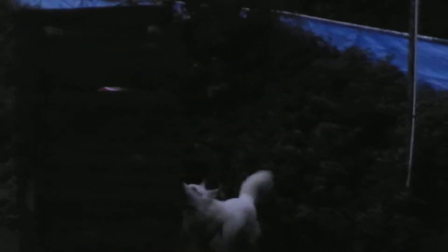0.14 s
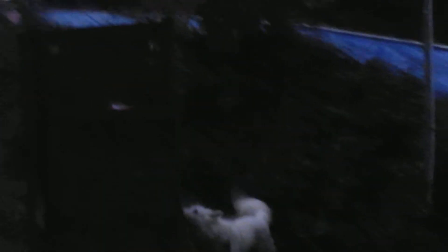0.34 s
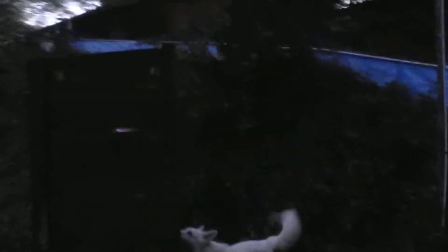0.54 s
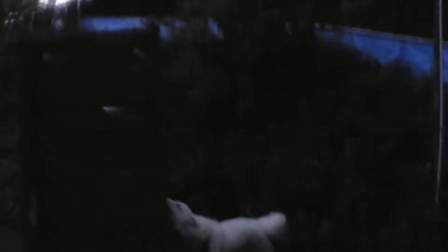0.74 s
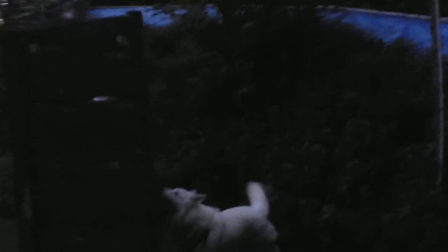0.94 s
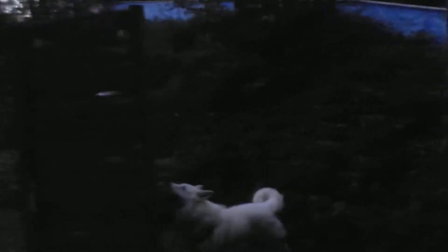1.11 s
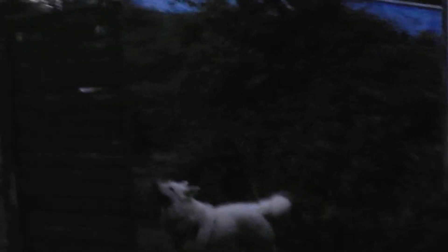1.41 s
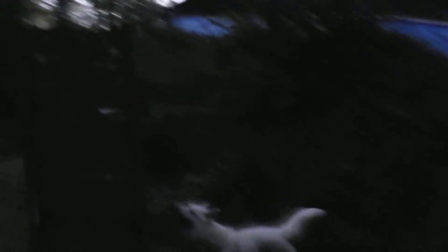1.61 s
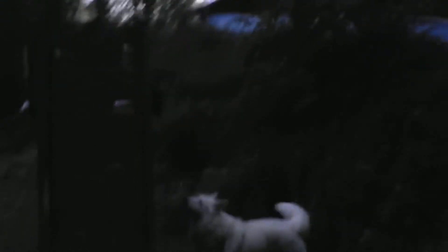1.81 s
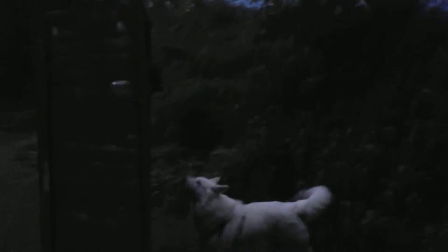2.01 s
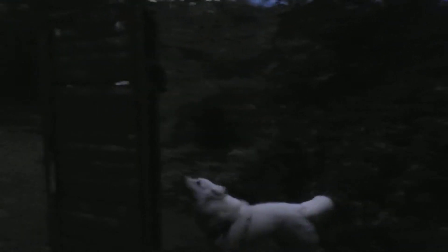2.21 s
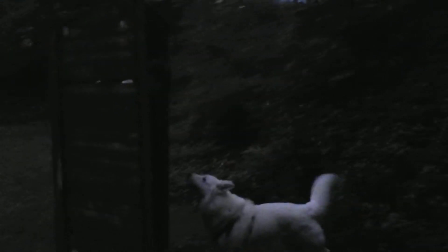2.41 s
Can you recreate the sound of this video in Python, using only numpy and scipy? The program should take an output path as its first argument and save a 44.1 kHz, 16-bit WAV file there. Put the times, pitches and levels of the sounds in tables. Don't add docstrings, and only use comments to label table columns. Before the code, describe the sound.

A large dog barks loudly at about 0.25, 0.8 and 2.15 seconds, each bark a short hoarse burst rising into a clear tone, then echoing off fences and walls. Light scuffs and ticks open the scene; a click comes near 1.2, soft steps around 1.6, and a faint distant call near 1.76. Sharp lead clicks, a quick whip and thud precede the last bark. Low outdoor hum, dull treble.

```python
import sys
import numpy as np
from scipy import signal
from scipy.io import wavfile
from scipy.ndimage import uniform_filter1d

SR = 44100
rng = np.random.default_rng(int(sys.argv[2]) if len(sys.argv) > 2 else 0)


def dump_mix(stems):
    frames = np.atleast_2d(stems).T
    limited = np.clip(frames, -1, 1)
    pcm = np.round(limited * 32767).astype(np.int16)
    wavfile.write(sys.argv[1], SR, pcm)


def nominal_scale(level):
    x = np.asarray(level, float) / 20
    return 10 ** x


N = 112454


def rms_one(x):
    return x / np.sqrt(np.mean(x ** 2) + 1e-20)


def at_hz(points, hz):
    table_hz, table_db = np.transpose(points)
    return np.interp(np.log(hz), np.log(table_hz), table_db)


def drift(rate_hz, size):
    r = np.exp(-2 * np.pi * rate_hz / SR)
    settle = 9000
    wander = signal.lfilter([1], [1, -2 * r, r * r], rng.standard_normal(size + settle))
    return rms_one(wander[settle:])


def resonate(x, hz, width_hz):
    r = np.exp(-np.pi * width_hz / SR)
    poles = [1, -2 * r * np.cos(2 * np.pi * hz / SR), r * r]
    return signal.lfilter([(1 - r * r) / 2, 0, (r * r - 1) / 2], poles, x)


def band(x, low_hz, high_hz):
    sos = signal.butter(2, [low_hz, min(high_hz, .45 * SR)], "band", fs=SR, output="sos")
    return signal.sosfilt(sos, x)


def add(out, start_s, x):
    i = int(start_s * SR)
    out[i:i + len(x)] += x[:len(out) - i]


def hum():
    # pitch_hz [Hz], level_db [dB per Hz]
    hum_colour = [(15, -43), (25, -13.5), (322, -1), (826, -14.5), (945, -8), (6730, -41), (10100, -42.5),
                  (14300, -40), (15500, -62)]
    hum_db, flicker_db, together_db = -47, 2.2, 0.45
    out = 0
    edges_hz = 22 * 2 ** np.arange(0, 9.6, .5)
    white = rng.standard_normal((2, N))
    together = drift(10, N)
    for k, (low, high) in enumerate(zip(edges_hz, edges_hz[1:])):
        colour_db = at_hz(hum_colour, np.sqrt(low * high))
        flicker = together_db * together + flicker_db * drift(9, N)
        out = out + band(white[k % 2], low, high) * nominal_scale(colour_db + flicker)
    return nominal_scale(hum_db) * rms_one(out)


def paws():
    # start_s [s], level_db [dB], pitch_hz [Hz]
    paw_falls = [
        (1.8, -40, 46),
        (1.585, -40.5, 150),
        (1.605, -31.5, 110),
        (0.0033, -40, 94),
    ]
    out, t = np.zeros(N), np.arange(2000) / SR
    for start_s, level_db, hz in paw_falls:
        add(out, start_s, nominal_scale(level_db) * np.sin(2 * np.pi * hz * t) * nominal_scale(-60 * t / 0.033))
    return out


def scuffs():
    scuff_starts = [.019, .094, .1, .103, .141, .162, .578, .62, .96, 1.21, 1.552, 1.577, 1.6, 1.76, 1.82,
                    1.925, 1.97, 2.09, 2.1085, 2.1385, 1.8, 1.905, 1.97]
    # length_s [s], level_db [dB], centre_hz [Hz]
    scuff_bursts = [(0.018, -51.5, 2170), (0.01, -33, 1970), (0.2, -52.5, 5550), (0.029, -35, 2800),
                    (0.022, -38.5, 3230), (0.021, -37, 1870), (0.017, -37.5, 1180), (0.0069, -46, 1700),
                    (0.068, -60.5, 6700), (0.0095, -56, 3160), (0.018, -43.5, 960), (0.017, -47, 1380),
                    (0.022, -41.5, 690), (0.17, -58.5, 2340), (0.24, -58.5, 3150), (0.045, -59.5, 4900),
                    (0.028, -55.5, 5900), (0.013, -33.5, 2070), (0.021, -25, 1690), (.012, -25.5, 2240),
                    (0.082, -56.5, 13000), (.06, -62.5, 6800), (.02, -56.5, 13000)]
    half_width_octaves, grains_per_s, grain_db = 0.67, 4900, 3.5
    out = np.zeros(N)
    noise = rng.standard_normal(N)
    struck = rng.random(N) < grains_per_s / SR
    grains = struck * nominal_scale(grain_db * rng.exponential(1, N))
    grit = noise * (1.4 + grains) * nominal_scale(2.5 * drift(300, N))
    for start_s, (length_s, level_db, hz) in zip(scuff_starts, scuff_bursts):
        u = np.linspace(0, 1.5, int(1.78 * length_s * SR))
        piece = grit[int(start_s * SR):][:len(u)]
        burst = band(piece, hz / 2 ** half_width_octaves, hz * 2 ** half_width_octaves)
        attack = np.clip(u * 62.0, 0, 1)
        release = np.clip((1.5 - u) * 0.95, 0, 1) ** 2
        add(out, start_s, nominal_scale(level_db) * rms_one(burst) * attack * release)
    return out


def ticks():
    tick_starts = [.0633, .084, .0992, .1177, 1.1905, 1.1907, 1.897, 1.9395, 2.0583, 2.0585, 2.1298]
    # peak_db [dB], body_hz [Hz], t60_s [s]
    tick_bodies = [(-23.5, 3260, 0.0014), (-35, 2500, 0.011), (-20, 1100, 0.011), (-21, 1900, 0.0069),
                   (-13, 730, 0.009), (-18.5, 2830, 0.005), (-50.5, 620, 0.008), (-34.5, 5600, .004),
                   (-8.5, 5600, 0.00096), (1, 1860, 0.0015), (-18, 2100, 0.0096)]
    crack_hz = 4200
    out, t = np.zeros(N), np.arange(1000) / SR
    for start_s, (peak_db, hz, t60_s) in zip(tick_starts, tick_bodies):
        noise = rng.standard_normal(len(t)) * nominal_scale(-60 * t / 0.002)
        crack = 0.4 * band(noise, 730, crack_hz)
        ring = np.sin(2 * np.pi * hz * t) * nominal_scale(-60 * t / t60_s)
        add(out, start_s, nominal_scale(peak_db) * (crack - band(ring, 330, 7.4 * crack_hz)))
    return out


def clear_tone(t, pitch, bright, second_db, rough):
    # pitch_hz [Hz], level_db [dB]
    throat_colour = [(300, -8), (480, 2.5), (950, 0.5), (1350, -0.86), (1950, 3),
                     (2430, -22), (2900, -24), (3400, -30), (3900, -29), (4400, -38), (5500, -46)]
    break_db, breaks_per_s = 8, 70
    phase = 2 * np.pi * np.cumsum(pitch) / SR
    tone, power = 0, 0
    for k in range(1, 15):
        mouth_db = bright * np.log2(min(k, 4) * pitch / 1000)
        gain = nominal_scale(at_hz(throat_colour, k * pitch) + mouth_db + second_db * (k == 2))
        depth_db = break_db * (.4 if k == 2 else 1) * rough
        breaks = nominal_scale(depth_db * (drift(breaks_per_s, len(t)) - rough))
        tone = tone + gain * breaks * np.sin(k * phase + k * k)
        power = power + gain ** 2 / 2
    return band(tone / np.sqrt(power), 256, 6200)


def hoarse_rasp(pitch, bright, closed, shimmer, noise, resonances):
    jitter, shimmer_db, low_hz, top_hz = .25, 5, 356, 2450
    wobble = drift(150.6, len(pitch))
    cycles = np.cumsum(pitch * np.exp(jitter * wobble)) / SR
    pulses = np.diff(np.floor(cycles), prepend=0) * nominal_scale(shimmer_db * shimmer)
    drive = -rms_one(pulses) + 0.61 * noise
    rasp = 0
    for k, (hz, width_hz, level_db, closed_db) in enumerate(resonances):
        ring = rms_one(resonate(resonate(drive, hz, width_hz), hz, 2.0 * width_hz))
        colour_db = level_db + closed_db * closed + bright * np.log2(hz / 1000)
        rasp = rasp + (-1) ** k * nominal_scale(colour_db) * ring
    rasp = band(band(rasp, low_hz, top_hz), low_hz / 2, top_hz)
    return rasp / np.sqrt(uniform_filter1d(rasp ** 2, size=900, mode="mirror"))


def bark(rows, hoarse, resonances):
    # centre_hz [Hz], level_db [dB]
    teeth_air = [(3300, -36.5), (4800, -37), (6500, -42.5), (10000, -43.5)]
    blend_s, edge_s, air_when_clear, rough_db = 0.017, 0.0018, 0.2, 1.55
    chest_hz, chest_db, chest_s = 133, -19, 0.031
    s, *contours = np.transpose(rows)
    t = np.arange(s[0], s[-1], 1 / SR)
    level_db, pitch, bright, second_db = [np.interp(t, s, c) for c in contours]
    clear_from, clear_until, start, clear, end = hoarse
    turns_s = [clear_from - blend_s, clear_from + blend_s, clear_until, clear_until + blend_s / 2]
    rough = np.interp(t, turns_s, [start, clear, clear, end])
    closed = np.clip((t - clear_until) / blend_s, 0, 1)
    shimmer, noise = drift(200, len(t)), rng.standard_normal(len(t))

    tone = clear_tone(t, pitch, bright, second_db, rough)
    rasp = hoarse_rasp(pitch, bright, closed, shimmer, noise, resonances)
    puffs = noise * (1 + 1.6 * np.sin(2 * np.pi * np.cumsum(pitch) / SR)) * nominal_scale(0.7 * shimmer)
    air = sum(nominal_scale(db) * rms_one(band(puffs, hz / 1.3, hz * 1.174)) for hz, db in teeth_air)
    push = np.exp(-((t - t[0]) / chest_s) ** 4)
    chest = nominal_scale(chest_db) * rms_one(resonate(noise, chest_hz, 150)) * push

    edges = np.clip(np.minimum(t - t[0], t[-1] - t) / edge_s, 0, 1)
    gain = edges * nominal_scale(level_db)
    hoarse_part = nominal_scale(rough_db) * np.sqrt(rough) * rasp + np.sqrt(air_when_clear + rough) * air + chest
    return gain * np.sqrt(1 - rough) * tone, gain * hoarse_part, 1 - rough


def pops():
    pop_starts = [.2535, .2605, .8045, .8195, 2.1625, 2.1765]
    # peak_db [dB], ring_hz [Hz], t60_s [s]
    pop_rings = [
        (-7, 650, .02),
        (-9, 2050, .012),
        (-5, 1300, .012),
        (-6, 580, .022),
        (-6, 590, .025),
        (-6, 600, .02),
    ]
    out, t = np.zeros(N), np.arange(1500) / SR
    for start_s, (peak_db, hz, t60_s) in zip(pop_starts, pop_rings):
        add(out, start_s, -nominal_scale(peak_db) * np.sin(2 * np.pi * hz * t) * nominal_scale(-60 * t / t60_s))
    return out


def far_call():
    # start_s [s], length_s [s], pitch_hz [Hz], level_db [dB]
    call_setting = (1.757, .08, 1330, -51)
    start_s, length_s, hz, level_db = call_setting
    out = np.zeros(N)
    u = np.linspace(0, np.pi, int(length_s * SR))
    call = rms_one(resonate(rng.standard_normal(len(u)), hz, 40))
    add(out, start_s, nominal_scale(level_db) * np.sin(u) * call)
    return out


def lead():
    # start_s [s], pitch_hz [Hz], level_db [dB]
    whip_glide = [
        (2.0516, 3020, -50),
        (2.0568, 3340, -13),
        (2.0588, 4280, -38),
        (2.064, 4190, -27),
        (2.068, 3240, -24.5),
        (2.076, 2420, -26),
        (2.081, 1680, -31),
    ]
    thud_s, thud_hz, thud_db, thud_width_s = 2.1165, 188, -15, 0.0025
    out = np.zeros(N)
    s, hz, level_db = np.transpose(whip_glide)
    t = np.arange(s[0], s[-1], 1 / SR)
    gain = nominal_scale(np.interp(t, s, level_db) + 2.0 * drift(650, len(t)))
    pitch = np.interp(t, s, hz) * (1 + 0.092 * drift(810, len(t)))
    add(out, s[0], gain * np.sin(2 * np.pi * np.cumsum(pitch) / SR))
    t = np.arange(N) / SR - thud_s
    bump = np.exp(-(t / thud_width_s) ** 2 / 2)
    return out + nominal_scale(thud_db) * np.cos(2 * np.pi * thud_hz * t) * bump


def yard(x, t60_s):
    # delay_s [s], spread_s [s], swell_db [dB]
    far_walls = [
        (0.2, 0.012, 10.4),
        (0.409, 0.08, 3.9),
        (0.29, 0.04, 2.3),
    ]
    # centre_hz [Hz], width_hz [Hz], share [0-1]
    echo_dips = [(480, 200, .25), (1930, 450, .8)]
    yard_db, low_hz, high_hz, build_up_s = -26.5, 685, 1580, 0.01
    t = np.arange(int(1.6 * SR)) / SR
    shape_db = -60 * t / t60_s + sum(db * np.exp(-((t - s) / w) ** 2) for s, w, db in far_walls)
    tail = rng.standard_normal(len(t)) * nominal_scale(shape_db) * np.clip(t / build_up_s, 0, 1)
    dull = signal.butter(1, [low_hz, high_hz], "band", fs=SR, output="sos")
    tail = signal.sosfilt(dull, tail)
    for hz, width_hz, share in echo_dips:
        tail = tail - share * resonate(tail, hz, width_hz)
    tail = tail / np.sqrt(np.sum(tail ** 2))
    return nominal_scale(yard_db) * signal.fftconvolve(x, tail)[:N]


def scene():
    # start_s [s], level_db [dB], pitch_hz [Hz], mouth brightness [dB per octave],
    # lift of the second overtone [dB]
    bark_contours = [
        [(.229, -31, 317.3, -4, 13), (.253, -12.5, 325.1, 2, -4.5), (.27, -12.5, 337.5, 2.3, 8),
         (.292, -15.5, 444.6, 1.5, 1.5), (.312, -11.5, 483.6, 0, 4), (.326, -11.5, 481.9, -6, -9),
         (.343, -13.5, 477.3, -5, -23), (.375, -24, 432, -1.5, -17), (.43, -37.5, 327, -17.5, -1)],
        [(.78, -35, 267.8, -1, 6), (.794, -22.5, 273.4, -5.5, 6), (.806, -14, 278.4, 4, 5),
         (.826, -12, 301.7, -1, 9), (.846, -13.5, 419.6, 4, 7), (.868, -13.5, 446.4, -1, 6.5),
         (.912, -15, 484.5, -2.5, -3), (.93, -25, 417.2, 0, 9), (.985, -31, 305, -11.5, -14)],
        [(2.148, -17.5, 287, -7.5, 11), (2.163, -10.5, 288.8, -3, 6.5), (2.178, -13, 299.3, 7, 12),
         (2.196, -18, 403, 2, 0.5), (2.214, -14.5, 468.7, 0, 2.7), (2.236, -12, 484.1, -1, 1.2),
         (2.261, -17, 468.5, -3.3, -2.8), (2.284, -25.5, 351.7, 4.5, -10.7), (2.325, -35.5, 279, -21.5, -1)],
    ]
    # clear_from_s [s], clear_until_s [s], roughness at start, while clear, at end [0-1]
    hoarseness = [
        (.268, .341, .62, .04, .75),
        (.845, .912, .55, .42, .75),
        (2.183, 2.259, .45, .006, .7),
    ]
    # pitch_hz [Hz], width_hz [Hz], level_db [dB], change as mouth closes [dB]
    throat_shapes = [
        [(476, 56, -14.5, 19.5), (618, 150, 1.5, -26), (883, 140, -6.5, 1), (1280, 110, -3, 8),
         (1623, 74, -9.5, 3), (2125, 250, -1, -5)],
        [(448, 130, -11.5, 8.5), (561, 84, 3, -14), (940, 330, -3, 3), (1288, 150, 2.6, -13.2),
         (1646, 190, -1.5, 2), (2030, 250, -6, -7.5)],
        [(433, 91, -21.5, 19), (558, 190, -2, -15), (1076, 120, -7.5, 15.5), (1290, 63, -0.2, -6),
         (1720, 140, -9, 1), (2180, 120, -8, 1)],
    ]
    clear_carries_db, hoarse_carries_db, near_carries_db = 11, -4, 4
    bright_carries_db = 31
    clear, rough, steady = np.zeros(N), pops(), np.zeros(N)
    for rows, hoarse, resonances in zip(bark_contours, hoarseness, throat_shapes):
        tone, rasp, clearness = bark(rows, hoarse, resonances)
        start_s = rows[0][0]
        add(clear, start_s, tone)
        add(rough, start_s, rasp)
        add(steady, start_s, tone * nominal_scale(clear_carries_db * clearness))
    near = paws() + scuffs() + ticks() + far_call() + lead()
    bright = nominal_scale(bright_carries_db) * band(band(rough, 3600, 7000), 3600, 7000)
    to_yard = steady + nominal_scale(hoarse_carries_db) * rough + nominal_scale(near_carries_db) * near
    far = yard(to_yard, 1) + yard(bright, 0.61)
    return (clear + rough + near + far + hum())[None, :]


def low_pass(x):
    return signal.sosfilt(signal.butter(12, 15800, fs=SR, output="sos"), x)


def record(dry):
    knee_db, squeeze, release_db_per_s = -22.5, 0.13, 114
    clip, clip_hardness = .7, 5
    notch_hz, treble_db = 7900, -14.5
    level_db = 10 * np.log10(uniform_filter1d(dry ** 2, size=300, axis=1) + 1e-12)
    ramp = release_db_per_s * np.arange(N) / SR
    held_db = np.maximum.accumulate(level_db + ramp, axis=1) - ramp
    cut_db = uniform_filter1d(squeeze * np.maximum(held_db - knee_db, 0), size=200, axis=1)
    x = dry * nominal_scale(0.5 - cut_db)
    x = x / (1 + np.abs(x / clip) ** clip_hardness) ** (1 / clip_hardness)
    x = signal.sosfilt(signal.butter(2, 68.6, "high", fs=SR, output="sos"), x)
    x = x - resonate(x, notch_hz, 700)
    treble = signal.sosfilt(signal.butter(4, notch_hz, "high", fs=SR, output="sos"), x)
    body = signal.sosfilt(signal.butter(4, notch_hz, "low", fs=SR, output="sos"), x)
    x = body + nominal_scale(treble_db) * treble
    x = signal.sosfilt(signal.cheby2(12, 60, 15800, fs=SR, output="sos"), x)
    return low_pass(x)


dry = scene()
out = record(dry)
dump_mix(out)
```